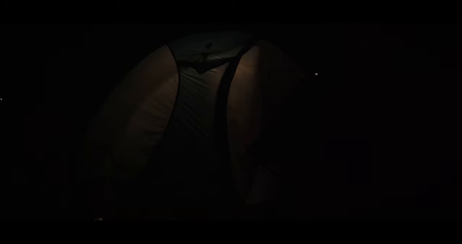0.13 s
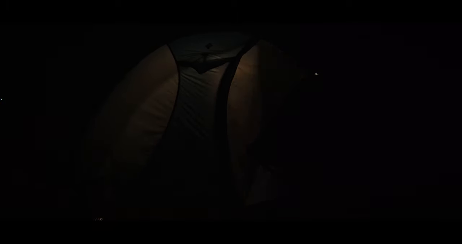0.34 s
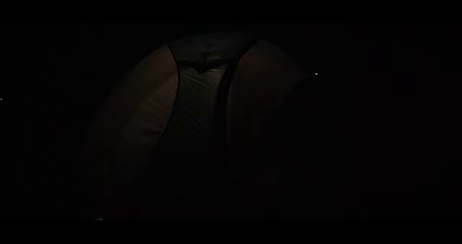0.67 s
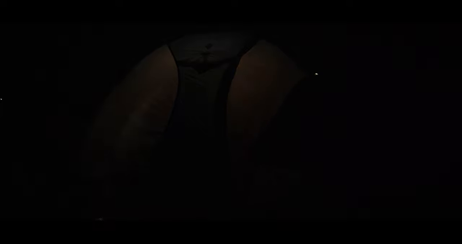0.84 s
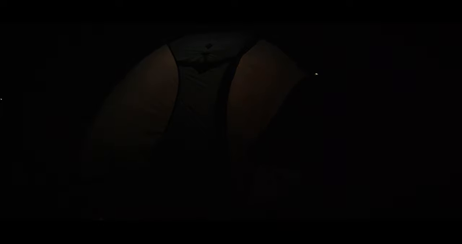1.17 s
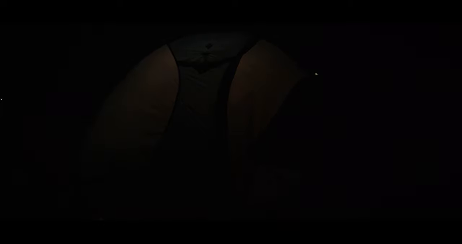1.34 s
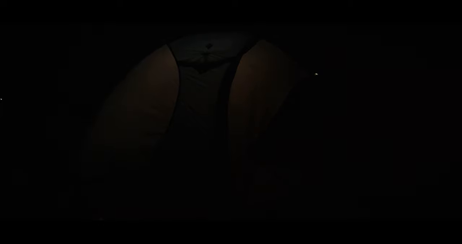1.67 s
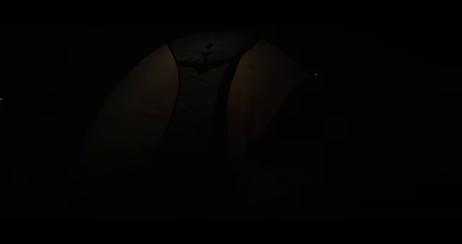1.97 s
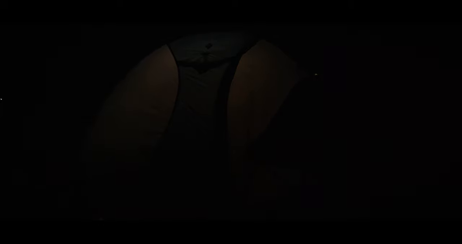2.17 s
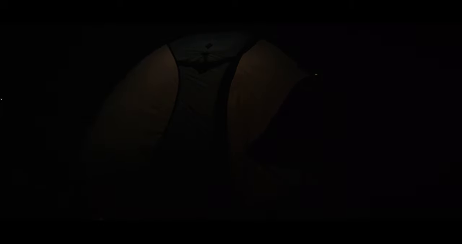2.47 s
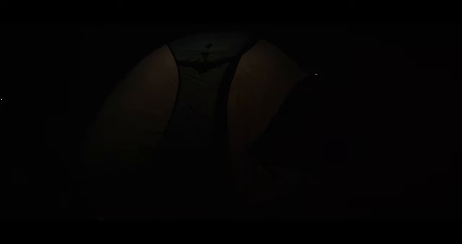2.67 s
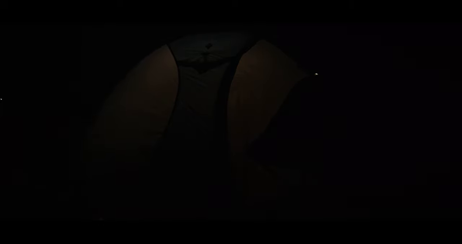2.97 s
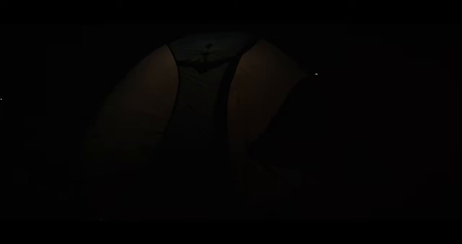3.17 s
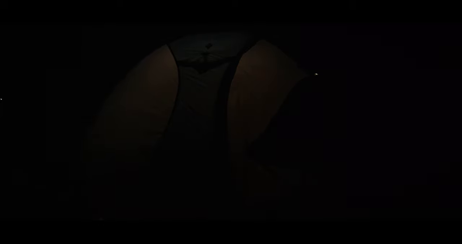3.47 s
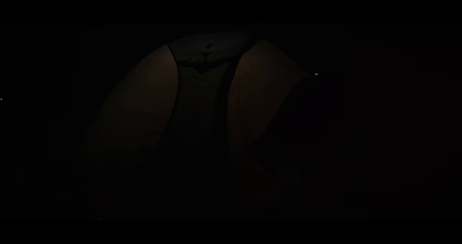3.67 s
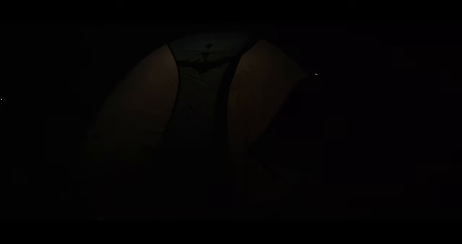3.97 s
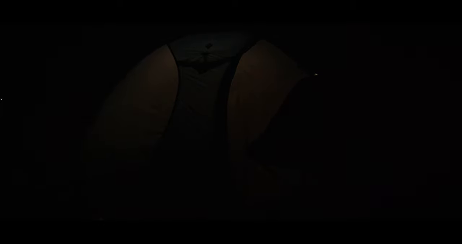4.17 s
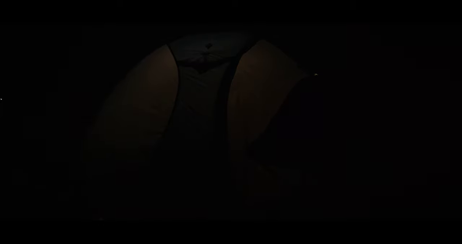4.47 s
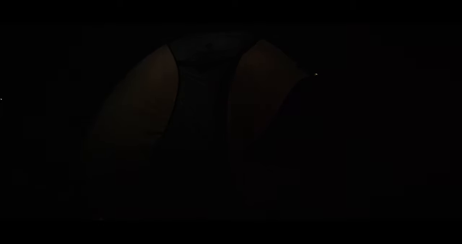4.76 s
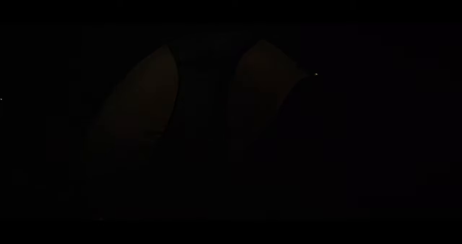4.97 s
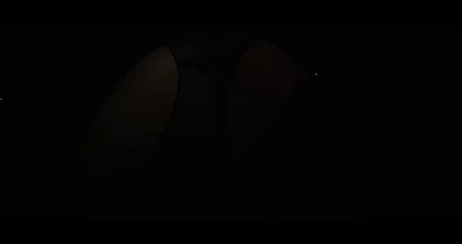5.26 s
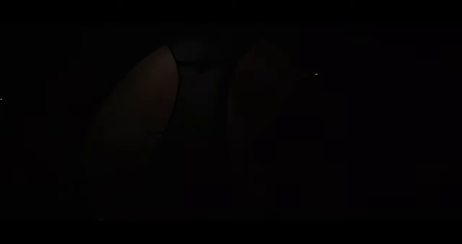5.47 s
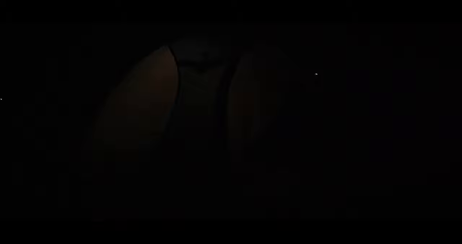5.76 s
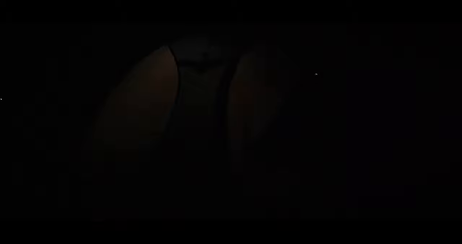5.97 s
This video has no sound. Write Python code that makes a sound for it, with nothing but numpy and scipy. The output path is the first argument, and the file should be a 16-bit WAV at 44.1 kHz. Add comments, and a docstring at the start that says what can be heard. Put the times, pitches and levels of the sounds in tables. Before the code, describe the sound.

Very close to a tent door outdoors at night: a brief fabric rustle, then a zip pulled for about two and a half seconds. Its rasp climbs to a buzzing, singing pitch, sags, surges again, then slows into grinding knocks as the metal tab jingles faintly. Afterwards loose nylon rustles and crackles in patches. Faint hiss and low air movement on the microphone throughout.

```python
"""Tent door unzipped at night

A slider plucks teeth at the speed of the hand in one long pull that surges and slackens, close up: slow teeth
knock the panel, fast ones merge into a rasp and a song of tooth-rate partials. Filtered noise adds friction;
resonant grains jingle the tab. The loose nylon flap swishes and buckles as filtered grains, briefly before the
zip and at length after it, when creases crack as decaying noise bursts.
Throughout, filtered noise gives a faint hiss and air swaying on the microphone.
"""
import sys
import numpy as np
from scipy import signal
from scipy.fft import rfft, irfft, next_fast_len
from scipy.io import wavfile
from scipy.ndimage import uniform_filter1d

SR = 44100
rng = np.random.default_rng(int(sys.argv[2]) if len(sys.argv) > 2 else 0)


def wav_record(signal):
    """Record a signal, one row per channel, as 16-bit PCM in the file named by sys.argv[1]."""
    frames = np.transpose(np.atleast_2d(signal))
    bounded = np.clip(frames, -1, 1)
    # unit amplitude maps onto the largest positive 16-bit level
    quanta = np.round(bounded * 32767).astype(np.int16)
    wavfile.write(sys.argv[1], SR, quanta)


N = 269892


def undb(db):
    """Decibels to gain."""
    return 10 ** (np.asarray(db) / 20)


def curves(rows):
    """Columns of a table, joined by straight lines in time."""
    s, *columns = np.transpose(rows)
    order = np.argsort(s, kind="stable")
    return [np.interp(np.arange(N) / SR, s[order], c[order]) for c in columns]


def unit(x):
    """Scale to rms 1."""
    return x / np.sqrt(np.mean(x ** 2) + 1e-20)


def steady(x, span_s):
    """Hold the short-term rms near 1."""
    size = max(int(span_s * SR), 2)
    power = uniform_filter1d(uniform_filter1d(x ** 2, size), size)
    return x / np.sqrt(np.abs(power) + 1e-12)


def colour(x, points):
    """Causal minimum-phase filter through (frequency [Hz], level [dB]) points."""
    hz, db = np.transpose(points)
    size = 2 * next_fast_len(len(x))
    f = np.maximum(np.arange(size // 2 + 1) * SR / size, 1e-3)
    gain = undb(np.interp(np.log(f), np.log(hz), db))
    # folding the cepstrum makes the filter causal
    cepstrum = irfft(np.log(gain))
    cepstrum[1:size // 2] *= 2
    cepstrum[size // 2 + 1:] = 0
    return irfft(rfft(x, size) * np.exp(rfft(cepstrum)))[:len(x)]


def resonate(x, hz, width_hz):
    """One resonance, gain 1 at its centre."""
    b, a = signal.iirpeak(hz, hz / min(width_hz, SR / 4), fs=SR)
    return signal.lfilter(b, a, x)


def ring(x, modes):
    """A body with several resonances; neighbouring modes swing in opposite directions."""
    return sum((-1) ** k * undb(db) * resonate(x, hz, width_hz)
               for k, (hz, width_hz, db) in enumerate(modes))


def walk(rate_hz):
    """Smooth random wander with an rms of 1."""
    size = int(SR / rate_hz)
    steps = np.repeat(rng.standard_normal(N // size + 1), size)
    return unit(uniform_filter1d(steps, size)[:N])


def grains(rate_hz, spread_db):
    """Random tiny impulses of either sign, most weak and a few strong."""
    hits = rng.random(N) < rate_hz / SR
    size_db = spread_db * np.minimum(rng.exponential(size=N), 4)
    return hits * rng.choice([-1, 1], N) * undb(size_db)


def envelope(start_s, length_s, attack_s, release_s):
    """Rise, hold until the length is over, then die away."""
    t = np.arange(N) / SR - start_s
    return np.clip(t / attack_s, 0, 1) * np.exp(-np.clip((t - length_s) / release_s, 0, 20))


# hiss of night air and microphone: (frequency [Hz], density [dB per Hz, relative])
NIGHT_SPECTRUM = [(59, -40), (100, 1), (270, -8.5), (438, -8.5), (497, -8), (808, -13.5), (1730, -15),
                  (7560, -22), (13600, -27), (15500, -28)]
NIGHT_DB = -55
# air pressure on the microphone: (frequency [Hz], density [dB per Hz, relative])
SWAY_SPECTRUM = [(1, -5), (2.5, 6.5), (5.5, -4), (10, -11.5), (20, -24), (40, -39), (70, -42), (120, -50.5),
                 (300, -57), (1000, -110)]
# strength of the sway: (time [s], level [dB])
SWAY_LEVEL = [(0, -25.5), (.6, -28.5), (1.5, -20), (2.4, -16), (3.5, -24.5), (4.5, -18.5), (6.1, -19.5)]


def night():
    """A faint even hiss and the slow push of air on the microphone."""
    sway_db, = curves(SWAY_LEVEL)
    hiss = unit(colour(rng.standard_normal(N), NIGHT_SPECTRUM)) * undb(NIGHT_DB)
    sway = unit(colour(rng.standard_normal(N), SWAY_SPECTRUM)) * undb(sway_db)
    return hiss + sway


# pull tab modes: (frequency [Hz], width [Hz], level [dB])
TAB_MODES = [(5880, 260, 1), (7800, 220, -4), (14080, 240, 0)]
# tab rattling on its ring: (start [s], length [s], level [dB])
TAB_RATTLES = [(0.0, 0.011, -46.5), (1.21, .2, -65), (1.5, 0.062, -52), (1.562, 0.2, -51.5),
               (1.783, 0.099, -55), (2.169, 0.022, -47), (2.27, .04, -54), (2.46, 0.061, -53),
               (2.73, 0.025, -56), (2.801, 0.036, -57.5), (2.935, 0.05, -55.5), (3.03, .02, -58)]
TAB_ATTACK_S, TAB_RELEASE_S, TAB_TREMBLE_DB = 0.0054, 0.019, -66


def pull_tab():
    """The small metal tab trembles while the slider moves, and now and then rattles and rings."""
    shake = sum(undb(db) * envelope(start_s, length_s, TAB_ATTACK_S, TAB_RELEASE_S)
                for start_s, length_s, db in TAB_RATTLES)
    chatter = ring(grains(rate_hz=480, spread_db=2.5), TAB_MODES)
    return steady(chatter, 0.067) * (shake + undb(TAB_TREMBLE_DB) * moving())


# folds buckling: (frequency [Hz], level [dB])
FOLD_SPECTRUM = [(60, -31), (150, 1.5), (350, 3), (700, -3.5), (1300, -9.5), (2200, -14), (4000, -21),
                 (10000, -29.5)]
# weave swishing: (frequency [Hz], level [dB])
SWISH_SPECTRUM = [(200, -3.5), (800, -0.5), (1600, -2.5), (3500, -6), (6000, -11), (8500, -13.5),
                  (11000, -25), (15500, -46)]
# nylon sliding over itself: (start [s], length [s], folds [dB], swish [dB])
FLAP_SLIDES = [(0.0, 0.017, -46, -51.5), (0.127, 0.012, -74, -59), (0.258, 0.076, -52, -73),
               (3.035, 0.29, -51.5, -51.5), (3.329, 0.073, -41.5, -46), (3.408, 0.15, -49.5, -46),
               (3.53, 0.18, -54, -61), (3.843, .24, -48, -51.5), (4.091, 0.26, -52.5, -52),
               (4.416, .1, -52.5, -59), (4.49, .27, -52, -53), (4.742, 0.2, -58, -64.5),
               (4.92, 0.72, -74, -76), (5.72, 0.24, -55.5, -58), (5.997, 0.13, -54, -70)]
SLIDE_SWELL_SHARE, SLIDE_RELEASE_S = 0.32, 0.031  # swell as a share of the slide's length


def flap():
    """Loose nylon: in each slide the weave swishes in fine grains while folds buckle in coarser ones."""
    buckle, slip = 0, 0
    for start_s, length_s, fold_db, swish_db in FLAP_SLIDES:
        push = envelope(start_s, length_s, SLIDE_SWELL_SHARE * length_s, SLIDE_RELEASE_S)
        buckle = buckle + undb(fold_db) * push
        slip = slip + undb(swish_db) * push
    folds = steady(colour(grains(rate_hz=520, spread_db=3.5), FOLD_SPECTRUM), .07)
    weave = unit(grains(rate_hz=1500, spread_db=3.5)) + .8 * rng.standard_normal(N)
    swish = unit(colour(weave, SWISH_SPECTRUM)) * undb(0.5 * walk(40))
    return folds * buckle + swish * slip


# slider motion, in consecutive stretches: (time [s], tooth rate [Hz], force on the slider [dB])
SLIDER_MOTION = [
    [(0.48, 115, -17), (0.545, 168, 0.5), (0.655, 379.3, -1.5), (0.745, 507, -4.5), (0.865, 474.7, -4.5),
     (0.897, 335, -4), (0.954, 375.5, -2.5), (1.014, 334, -2)],
    [(1.15, 569.6, 0), (1.2, 568, -1.5), (1.232, 822, -1), (1.33, 885, 4), (1.36, 735, -2.5),
     (1.43, 529.7, -2), (1.485, 422.6, 0), (1.576, 494.3, -3), (1.7, 210, -1)],
    [(1.76, 225.2, -1.5), (1.89, 550.4, -0.5), (1.918, 554.3, 3), (1.94, 694.4, 1.5), (2.0, 786, 2.5),
     (2.064, 734, 3), (2.13, 611.7, 5.5), (2.213, 532.8, 5.5), (2.24, 231.4, 4), (2.3, 211.8, 9),
     (2.345, 118.5, 11)],
    [(2.42, 90, 13), (2.46, 139.8, 11), (2.5, 250.5, 2), (2.55, 293.4, 5.5), (2.606, 276.3, 4.5),
     (2.652, 303.4, 5.5), (2.7, 280.1, 7), (2.77, 268.1, 8.5), (2.81, 180.1, 4), (2.87, 135.3, 8),
     (2.98, 111.5, 14.5), (3.03, 80.3, 4), (3.06, 69.9, -16)],
]


def moving(attack_s=.03, release_s=0.011):
    """Fade in as the slider starts, hold at 1, fade out as it stops."""
    start_s, end_s = SLIDER_MOTION[0][0][0], SLIDER_MOTION[-1][-1][0]
    return envelope(start_s, end_s - start_s, attack_s, release_s)


def teeth(turns, scatter_db, slop):
    """One impulse as each tooth passes, early or late by a share of its spacing, placed between samples."""
    number = np.arange(1, int(turns[-1]))
    timing, strength = rng.standard_normal((2, len(number)))
    passing = number + np.interp(number, turns, slop) * timing
    at = np.interp(passing, turns, np.arange(N))
    size = undb(scatter_db * strength)
    taps = at.astype(int)[:, None] + np.arange(-5, 7)
    lag = taps - at[:, None]
    pulses = np.zeros(N)
    np.add.at(pulses, np.clip(taps, 0, N - 1), size[:, None] * np.sinc(lag) * np.sinc(lag / 6))
    return pulses


def tape(x, turns, ring_s, span_teeth):
    """Waves run along the tape and come back from its seams; random echoes shift as the slider travels."""
    t = np.arange(SR // 40) / SR
    place = turns / span_teeth
    out = np.zeros(N + len(t))
    for k, chance in enumerate(rng.standard_normal((int(place[-1]) + 2, len(t)))):
        near = np.flatnonzero(np.abs(place - k) < 1)
        if len(near):
            echoes = chance * np.exp(-t / ring_s)
            echoes *= .8 / np.linalg.norm(echoes)
            echoes[0] += .6  # direct wave
            fade = np.cos(np.pi / 2 * (place[near] - k))
            part = signal.fftconvolve(x[near] * fade, echoes)
            out[near[0]:near[0] + len(part)] += part
    return out[:N]


# taut panel's answer to a partial of the tooth rate: (frequency [Hz], level [dB])
TAUT_RESPONSE = [(150, -4), (300, -8.5), (480, 1), (700, 2), (1050, -1.5), (1500, -9.5), (1900, -21.5),
                 (3000, -18)]
# brief swells as a partial meets a resonance: (time [s], length [s], resonance [Hz], boost [dB])
PANEL_BOOMS = [(0.54, 0.052, 310, 13), (0.595, .06, 235, 13.5), (0.765, 0.37, 3140, 19.5),
               (0.78, 0.24, 1460, 12.5), (1.264, 0.036, 831, 16), (1.26, 0.069, 1650, 13),
               (1.376, 0.065, 661, 9.5), (1.505, 0.094, 430, 8.5), (1.64, 0.084, 630, 11),
               (1.792, .035, 580, 11.5), (1.958, 0.074, 710, 14), (1.995, 0.17, 2300, 28),
               (2.08, .1, 2780, 14), (2.115, 0.12, 642.5, 8.5), (2.266, 0.094, 224.7, 11.5),
               (2.3, 0.046, 650, 7), (2.54, 0.056, 589.6, 5), (2.684, 0.28, 1390, 11),
               (2.754, 0.12, 521, 6.5)]
UPPER_PARTIALS_DB = -12.5  # third partial and above
BOOM_WIDTH_OCTAVES = 0.37


def singing(hz, turns, waver_db, jitter_turns, count=6):
    """The taut cloth follows the lowest partials of the tooth rate and swells where they meet a resonance."""
    t = np.arange(N) / SR
    taut_hz, taut_db = np.transpose(TAUT_RESPONSE)
    out = 0
    for k in range(1, count + 1):
        pitch = np.log2(k * hz)
        db = np.interp(pitch, np.log2(taut_hz), taut_db) + UPPER_PARTIALS_DB * (k > 2)
        for s, length_s, boom_hz, boost_db in PANEL_BOOMS:
            near = np.abs(t - s) < 2 * length_s
            in_time = (2 * (t[near] - s) / length_s) ** 2
            in_pitch = ((pitch[near] - np.log2(boom_hz)) / BOOM_WIDTH_OCTAVES) ** 2
            db[near] += boost_db * np.exp(-in_time - in_pitch)
        phase = 2 * np.pi * (k * turns + jitter_turns * walk(350))
        out = out + undb(db + waver_db * walk(39.97)) * np.sin(phase)
    return out


# door panel modes: (frequency [Hz], width [Hz], level [dB])
PANEL_MODES = [(111, 183, 11), (247, 175, -13.5), (330, 160, -16), (582, 156, 12.5), (745, 36, -31)]
# tooth snapping through the slider: (frequency [Hz], level [dB])
TOOTH_SPECTRUM = [(200, -1), (550, -8.5), (850, 6.5), (1250, 3.5), (1750, 2), (2300, -1), (2950, -2.5),
                  (4200, -5), (5500, -11), (8000, -21), (15000, -42)]
# slider rubbing along the tape: (frequency [Hz], level [dB])
RUB_SPECTRUM = [(80, -14), (250, 2), (700, -8), (1500, -6), (2500, -5.5), (4000, -6), (5600, -0.5),
                (6800, -6.5), (8400, -3), (10500, -12), (13000, -11.5), (16000, -31)]
# how well the panel radiates as the slider crosses it: (time [s], level [dB])
PANEL_RADIATION = [(0.5, -9.5), (0.7, -5), (0.82, -5), (1.0, -5.5), (1.22, -6.5), (1.5, -6), (1.7, -2.5),
                   (1.87, -4.5), (2.26, 1.5), (2.38, 0), (2.52, 1.5), (2.7, -4.5), (2.9, -2.5)]
# base levels at the reference tooth rate; speed, force, radiation and glide then shift them
REFERENCE_HZ = 500
RASP_DB, RASP_DB_PER_OCTAVE = -45.5, 5.5
RUB_DB, RUB_DB_PER_OCTAVE, RUB_FORCE_SHARE = -49.5, 7, 0.82
KNOCK_DB, KNOCK_DB_PER_OCTAVE, KNOCK_FORCE_SHARE = -30, 3.5, 0.41
SONG_DB, KNOCK_BELOW_HZ, CREAK_SHARE = -32.5, 272, 0.37


def zipper():
    """Teeth knock the panel one by one at low speed and merge into a singing rasp at high speed."""
    hz, force_db = curves(np.vstack(SLIDER_MOTION))
    panel_db, = curves(PANEL_RADIATION)
    octaves = np.log2(hz / REFERENCE_HZ)
    rasp_db = RASP_DB + RASP_DB_PER_OCTAVE * octaves + force_db
    rub_db = RUB_DB + RUB_DB_PER_OCTAVE * octaves + RUB_FORCE_SHARE * force_db
    glide = 1 / (1 + (185 / hz) ** 8)  # 0 = catching on each tooth, 1 = running freely
    catch = 1 - glide
    stumble = (.010 + .11 * catch) * walk(250) + .013 * walk(55)
    turns = np.cumsum(hz * np.exp(stumble)) / SR  # teeth passed

    song = singing(hz, turns, waver_db=3.0, jitter_turns=0.036)
    song *= np.sqrt(glide) * undb(SONG_DB + panel_db)
    song *= 1 + .17 * walk(600)  # uneven push

    # at low speed the slack cloth answers each tooth unevenly, with loose creaking
    slow = 1 / (1 + (hz / KNOCK_BELOW_HZ) ** 10)
    knock_db = KNOCK_DB + KNOCK_DB_PER_OCTAVE * octaves + KNOCK_FORCE_SHARE * force_db
    knock_db += panel_db - 2.9 * glide
    knocks = teeth(turns, scatter_db=3.2, slop=.06 + .11 * catch)
    knocks = unit(tape(knocks, turns, ring_s=0.0022, span_teeth=5))
    creaks = CREAK_SHARE * catch * unit(grains(rate_hz=900, spread_db=4))
    knock = steady(ring(knocks + creaks, PANEL_MODES), 0.042) * undb(knock_db) * slow

    # fast teeth snap cleanly, slow ones grind through the slider
    pulses = teeth(turns, scatter_db=1.8, slop=.015 + .1 * catch)
    snaps = steady(tape(pulses, turns, ring_s=.004, span_teeth=44), .04)
    grind = unit(grains(rate_hz=2500, spread_db=3))
    contact = (.45 + .55 * glide) * snaps + .9 * catch * grind
    rasp = steady(colour(contact, TOOTH_SPECTRUM), .04) * undb(rasp_db + 1 + 2 * glide)

    # at a moderate speed each tooth pushes longer, so the tape buzzes in the middle range
    moderate = glide / (1 + (hz / 560) ** 6)
    buzz = resonate(resonate(snaps, 810, 1080), 810, 870)
    rasp += steady(buzz, 0.086) * undb(rasp_db - 3.6) * moderate

    # friction comes in one spurt for each tooth
    spurts = rng.standard_normal(N) * (1.5 + np.exp(-(turns % 1) / .4))
    rub = steady(colour(spurts, RUB_SPECTRUM), .04) * undb(rub_db + .8 * walk(50))
    return moving() * (knock + song + rasp + rub)


# creases snapping over: (time [s], crack [dB], thud of the sheet [dB], crisp snap [dB])
CREASE_SNAPS = [(3.043, -52, -40.5, -53), (3.142, -62, -54, -61), (3.251, -51, -35, -49),
                (3.585, -56, -38, -58), (3.664, -65, -42, -66), (3.686, -67, -40.5, -70),
                (3.728, -61, -48, -66), (3.761, -70, -43, -67), (3.834, -56, -36, -69),
                (4.091, -45, -42, -61), (4.111, -43, -56, -54), (4.161, -43.5, -67, -52),
                (4.184, -42.5, -54, -59), (4.288, -50, -41, -61), (4.334, -47, -49, -51),
                (4.445, -48, -45, -58), (4.546, -44.5, -39.5, -55), (4.56, -46, -46, -53),
                (4.621, -43, -57, -60.5), (4.64, -43, -49, -63), (5.301, -58, -57, -56),
                (5.337, -48, -61, -43.5), (5.49, -53, -65, -70), (5.517, -50.5, -54, -51),
                (5.756, -65, -51, -52), (5.8, -47, -36, -72), (5.811, -47, -49, -56),
                (5.882, -46, -50, -70), (5.923, -52, -49, -65), (5.962, -43, -56, -65),
                (5.981, -42.5, -58, -63)]
CRACK_S, CRACKLE_S, CRACKLE_DB = 0.007, 0.04, -19  # decay times; crackle relative to crack


def creases():
    """Each crease cracks sharply and shakes the sheet around it, with a short crackle after."""
    out = np.zeros(N + SR)
    t = np.arange(SR // 10) / SR
    decay = np.exp(-t / CRACK_S) + undb(CRACKLE_DB) * np.exp(-t / CRACKLE_S)
    for s, *levels_db in CREASE_SNAPS:
        crackle = rng.standard_normal((3, len(t))) * decay
        crack = resonate(resonate(crackle[0], 510, 690), 1460, 1200)
        thud = resonate(resonate(crackle[1], 240, 540), 395, 450)
        snap = resonate(resonate(crackle[2], 3200, 2800), 3800, 3800)
        start = int(s * SR)
        for part, db in zip((crack, thud, snap), levels_db):
            level = undb(db) * np.sqrt(CRACK_S * SR) / np.linalg.norm(part)
            out[start:start + len(t)] += level * part
    return out[:N]


def scene():
    """Zip, tab and cloth in the open air."""
    return (night() + pull_tab() + flap() + zipper() + creases())[None]


TOP_HZ = 15700


def record(dry):
    """The recorder cuts the top: a steep elliptic low-pass."""
    low_pass = signal.ellip(10, .2, 80, TOP_HZ, fs=SR, output="sos")
    return signal.sosfilt(low_pass, dry)


dry = scene()
out = record(dry)
wav_record(out)
```